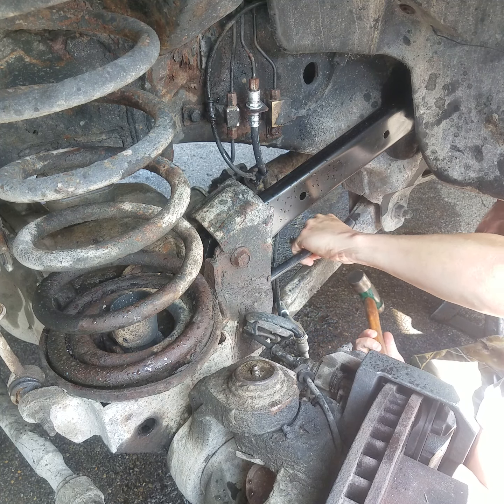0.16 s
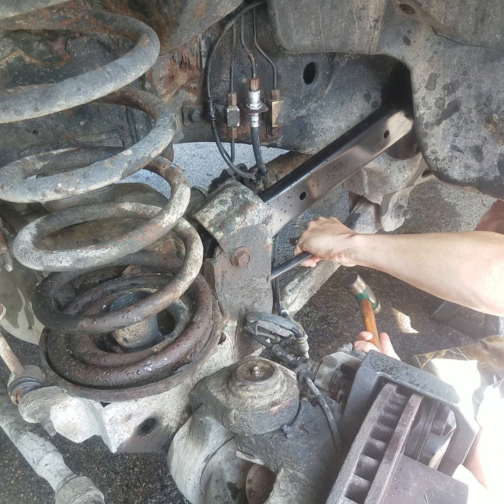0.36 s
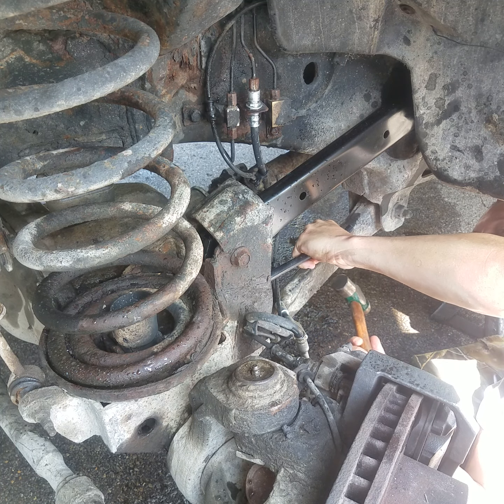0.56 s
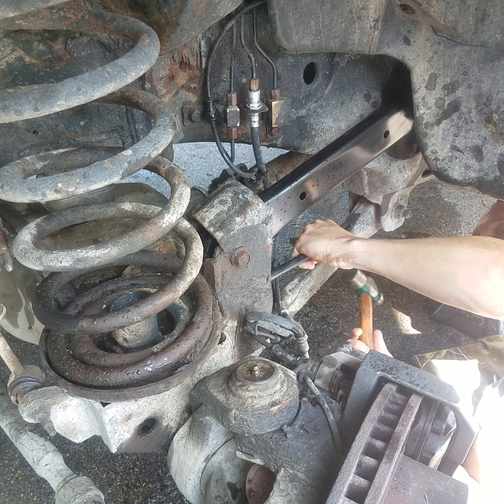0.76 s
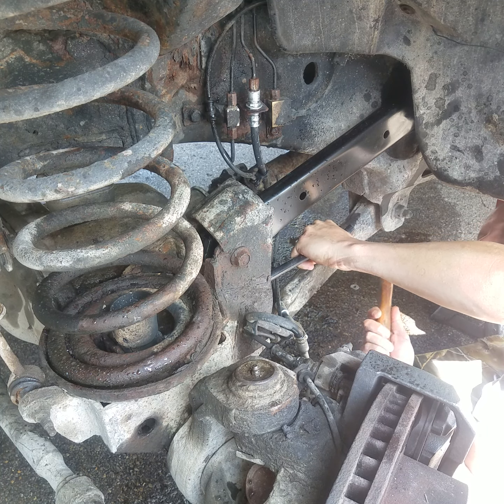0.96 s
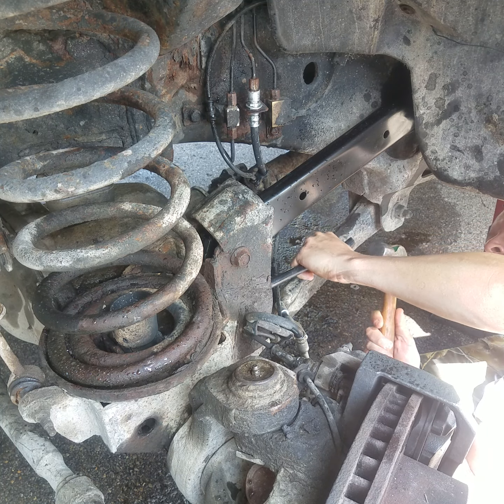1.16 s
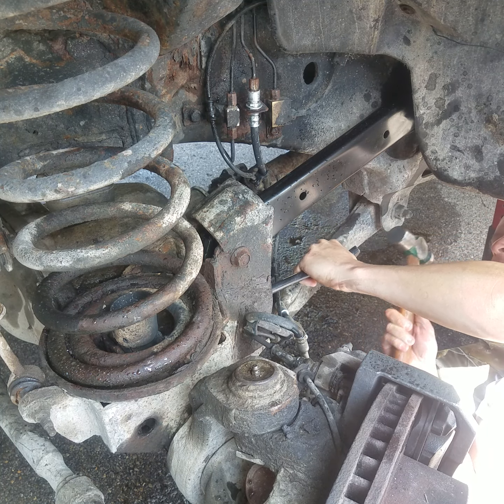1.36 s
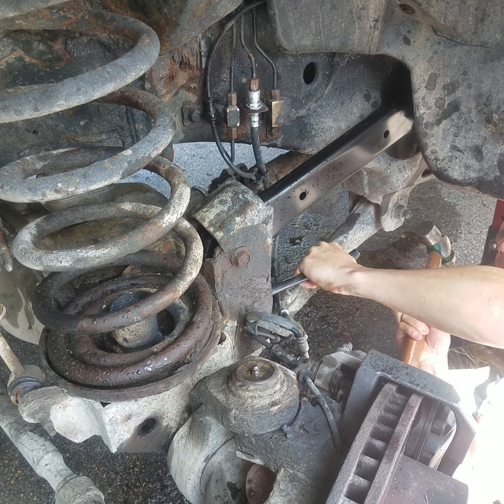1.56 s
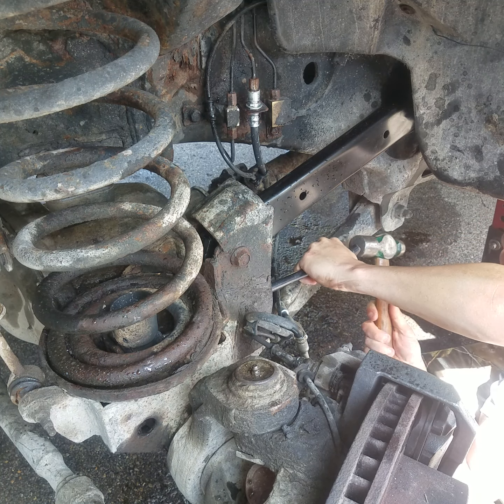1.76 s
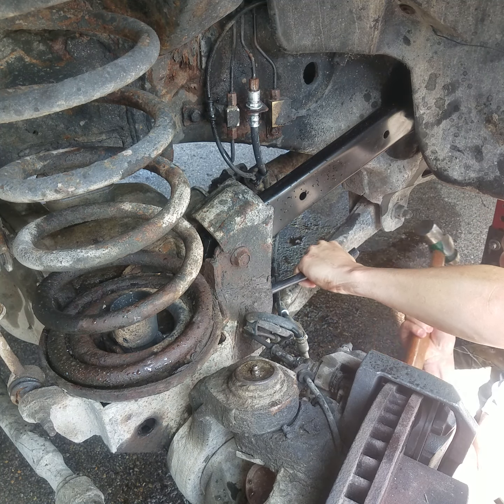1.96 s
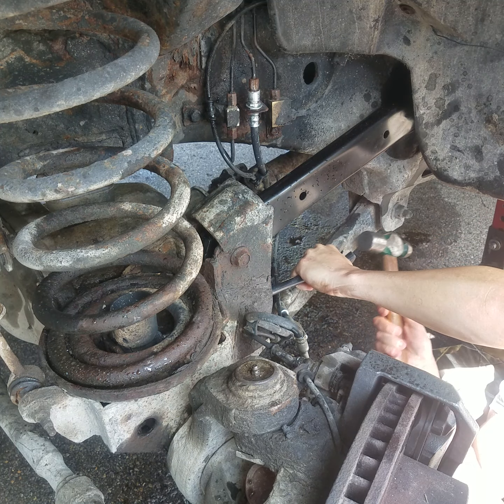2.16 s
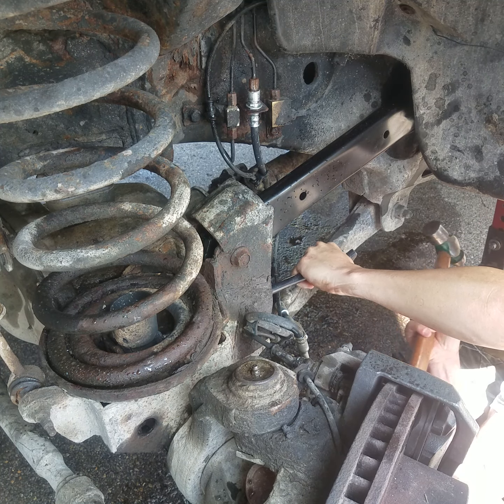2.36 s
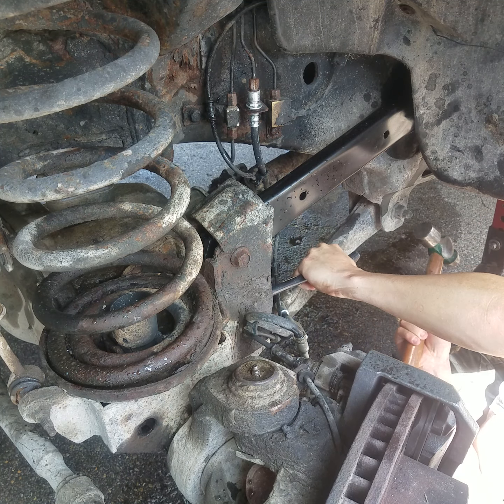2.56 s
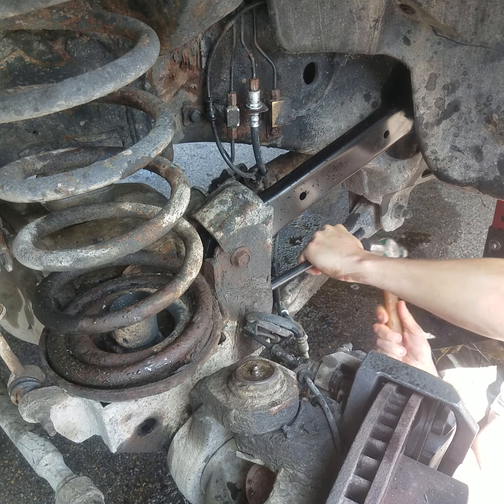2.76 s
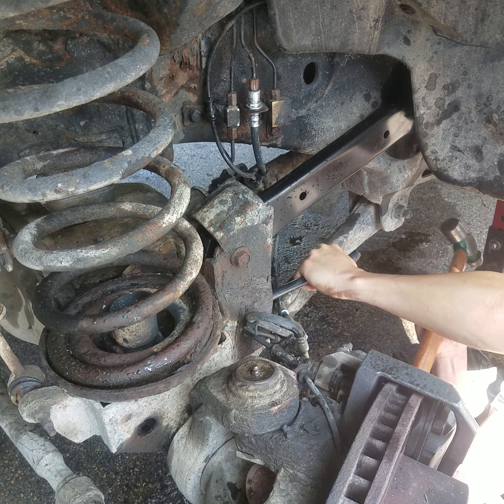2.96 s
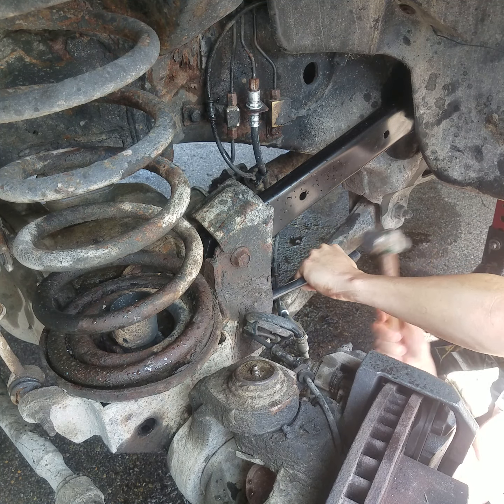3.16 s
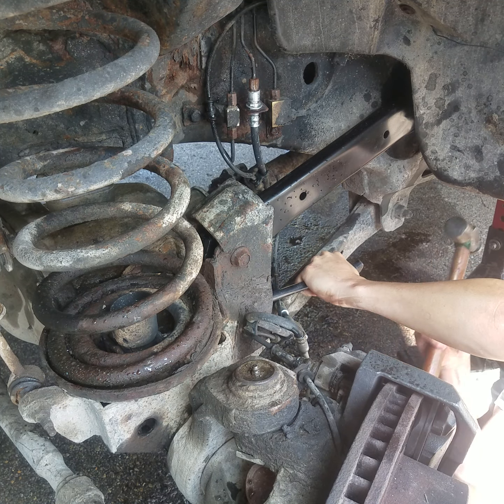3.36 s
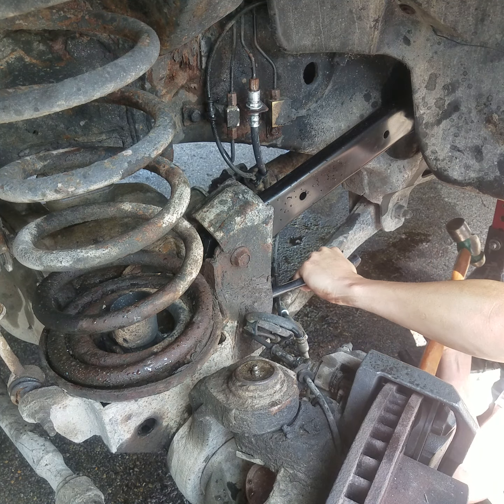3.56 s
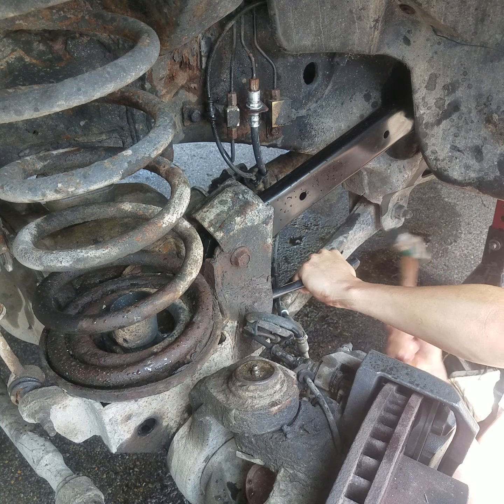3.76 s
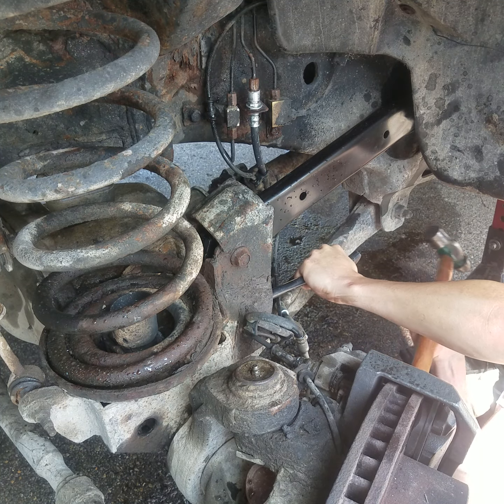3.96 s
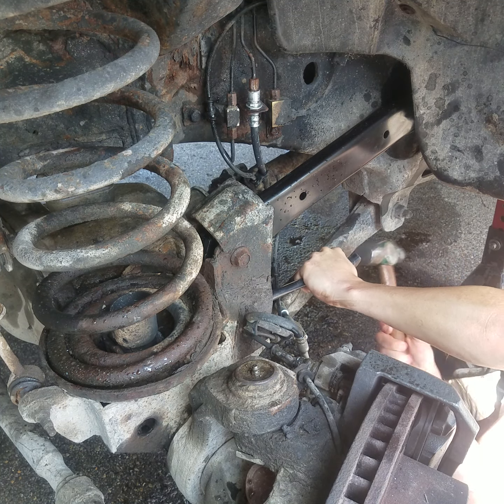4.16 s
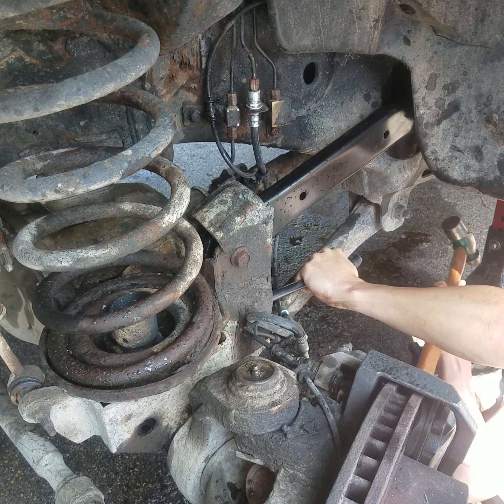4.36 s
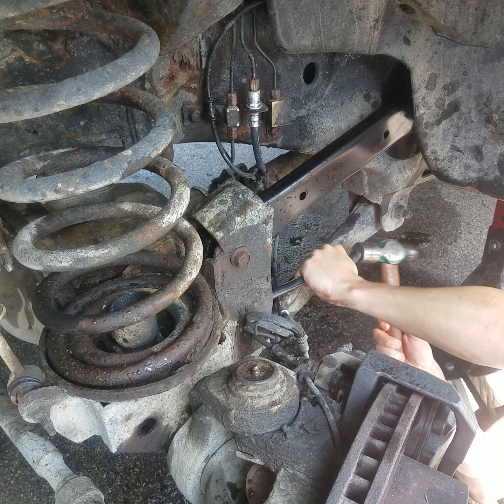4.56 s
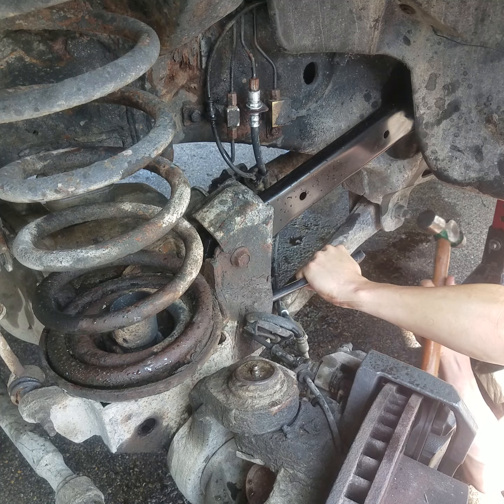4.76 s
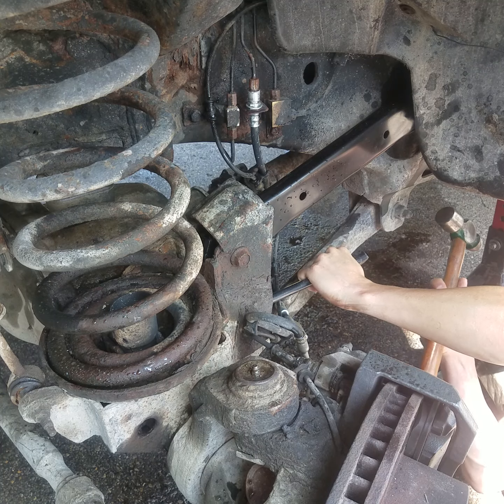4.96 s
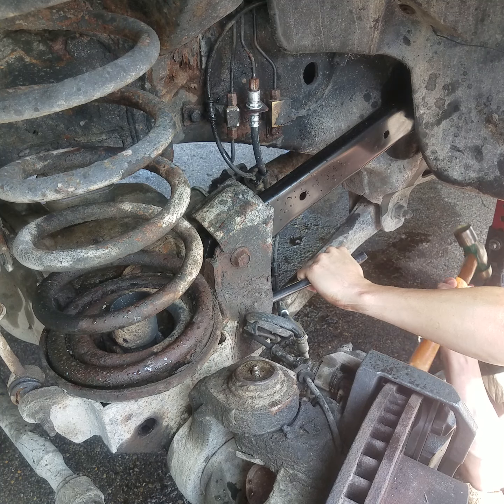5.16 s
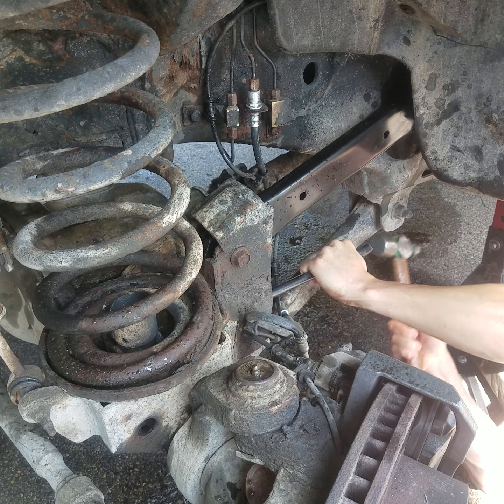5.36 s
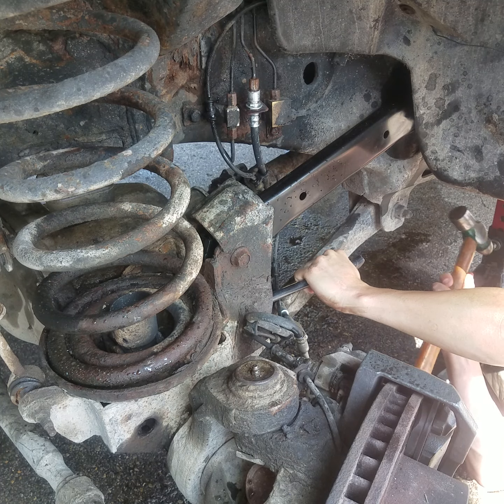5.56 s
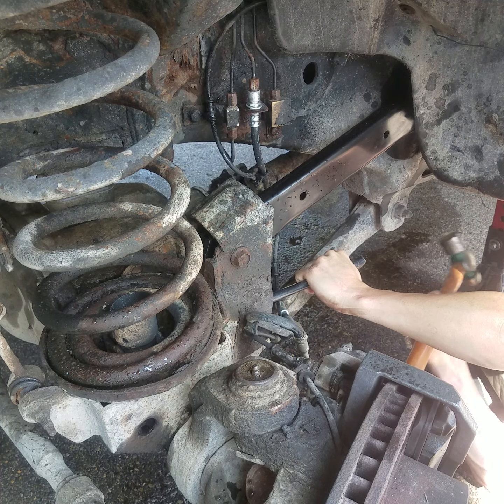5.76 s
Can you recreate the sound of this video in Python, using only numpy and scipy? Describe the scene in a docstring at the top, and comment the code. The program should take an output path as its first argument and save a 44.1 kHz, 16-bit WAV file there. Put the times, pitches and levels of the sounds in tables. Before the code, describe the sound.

A few soft metal clinks and a faint hum give way to close hammering on a steel punch held to a car's suspension bolt. Nine bright, cracking blows land at a slightly uneven pace, each ringing briefly and echoing in the garage while the coil spring sings faintly. Now and then the hammer glances onto the chassis with a duller knock, and tiny ticks and clinks dot the gaps.

```python
"""In a garage, a low rush and hum ease off while tools clink lightly against a bolt of a car's suspension.
From 1.7 s a hammer drives a steel punch against the bolt, about two blows a second, and the rush sinks.
Each blow rings the punch, bolt and suspension arm; the coil spring sings on and the garage echoes.
After some blows the hammer knocks dully on the chassis. Soft clinks and faint ticks fall in between."""
import sys
import numpy as np
from scipy import signal
from scipy.fft import rfft, irfft, next_fast_len
from scipy.io import wavfile

SR = 44100
rng = np.random.default_rng(int(sys.argv[2]) if len(sys.argv) > 2 else 0)


def to_wav(s):
    """Save 16-bit WAV."""
    ch = np.atleast_2d(s).T  # columns
    pcm = np.round(np.clip(ch, -1, 1) * 32767)  # PCM
    wavfile.write(sys.argv[1], SR, pcm.astype(np.int16))


N = 256662
HIT_SAMPLES, ATTACK_SAMPLES = SR // 4, SR // 50  # one whole hit, and its first 20 ms
HIT_TIME = np.arange(HIT_SAMPLES) / SR

# How alike left and right sound, 1 being the same: (frequency [Hz], likeness [0 to 1])
STEREO_LIKENESS = [(50, .82), (160, 0.97), (450, .7), (800, 0.5), (1300, .15), (16000, 0.029)]
# Tone of the early rush, the steady quiet noise and the ticks: (frequency [Hz], level [dB])
RUSH_COLOUR = [(25, -25.5), (60, -11), (110, -7.5), (200, -15), (310, -12.5), (500, -14.5), (1160, -22.5),
               (2000, -29.5), (3000, -31.5), (5100, -44), (7300, -44.5), (8600, -54.5), (14000, -45),
               (16000, -46.5)]
QUIET_COLOUR = [(25, -31), (55, -4), (95, -5), (125, 1), (190, -1.5), (250, -12.5), (420, -11), (800, -13),
                (1200, -20), (2500, -24), (4000, -31), (9000, -39.5), (14000, -28.5)]
TICK_COLOUR = [(500, -24.5), (4000, -6.5), (9000, -2), (15000, -2)]
# Strength of the garage's echo: (frequency [Hz], level [dB])
GARAGE_GAIN = [(50, -11.5), (150, 6), (400, -12.5), (1000, -15.5), (2500, -20.5), (6000, -21), (15000, -16)]
# Time that the echo and the steel take to fade by 60 dB: (frequency [Hz], ring time [s])
GARAGE_RING_TIMES = [(120, 0.64), (400, 0.31), (1000, 0.3), (2500, 0.51), (6000, 0.48), (15000, 0.22)]
STEEL_RING_TIMES = [(150, 0.11), (500, 0.099), (1200, 0.098), (3000, 0.095), (7000, 0.088), (15000, 0.048)]
# Tone of each hit's clatter, a crowd of notes too close to tell apart: (frequency [Hz], level [dB])
CLINK_COLOUR = [(60, -16), (400, 3.5), (1800, 4), (3600, 0), (4500, -9.5), (9500, -22), (14500, -18.5)]
KNOCK_COLOUR = [(40, -20), (200, -25), (340, 2.5), (750, -1.5), (1000, -3.5), (2000, -5), (3600, -4.5),
                (4600, -11.5), (8000, -27), (15700, -11.5)]
BLOW_COLOUR = [(40, -33.5), (150, -9.5), (240, -8), (330, -3), (550, 3), (950, -1), (1400, 3.5),
               (2000, 0.5), (3300, 2.5), (6000, -7.5), (9300, -10), (11000, -8), (13300, -8.5),
               (14000, 0.5), (14700, -8)]
# The notes that each thing rings with: (frequency [Hz], level [dB], ring time [s])
WALL_NOTES = [(307.6, -4, 0.16), (363.5, 5.5, 0.1), (389, -1, 0.12), (460, -1, .2), (523, 1, 0.17),
              (581, -10.5, 0.34)]
SPRING_NOTES = [(172, -12.5, 2.1), (354, -3.5, 0.5), (1186, 1, .33), (1400, -5.5, .5), (1700, -4.5, 0.55),
                (1850, -9.5, .6), (2700, -4.5, 0.3)]
SPRING_LONG_HIGH_NOTE = [(2008, -9, 1.2)]
CHASSIS_NOTES = [(421.3, -12.5, 0.33), (488.6, 2.5, 0.16), (608.6, -4.5, 0.21), (704.4, 2, 0.085),
                 (743.4, -1, 0.098), (851, -11, .2), (1190, -4.5, 0.15), (1300, -3, 0.055),
                 (1384, -10, 0.27), (1595, -5.5, 0.082), (1826, -10, 0.13), (1950, -12, 0.14),
                 (2120, -7, .14), (2595, -12, 0.14), (3090, -7, 0.081), (3630, -6.5, 0.065)]
ARM_NOTES = [(1177, -0.5, 0.036), (1267, -8, 0.017), (1450, -8.5, 0.061), (1568, -5, 0.08),
             (1794, -0.5, 0.087), (1797, -2, 0.081), (2623, -1.5, .06), (3200, -11, 0.03),
             (3670, -8.5, 0.017)]
BOLT_NOTES = [(3585, -0.5, .075), (5310, -11, .085), (6460, -9, 0.095), (7060, -17, 0.12),
              (8700, -19, 0.045), (11100, -19.5, .08), (12100, -15, .07), (14340, -18.5, .06)]
PUNCH_NOTES = [(2262, -3, 0.088), (2220, -8.5, 0.076), (5115, -6, 0.076), (5180, -9, 0.073),
               (14000, -9.5, .04)]
# Tools shifting against the bolt: (time [s], level [dB], brightness [dB per octave])
CLINKS = [(.012, -28, 0), (.031, -32, -.5), (.048, -38, -7.5), (.1743, -37.5, -0.5), (.216, -42.5, -5.5),
          (.263, -49, -6.5), (.3217, -39, -5.5), (.343, -49.5, -4), (.363, -47.5, -6), (1.37, -54, 0),
          (1.995, -52.5, -7.5), (2.043, -48, -4.5), (2.941, -46, -6), (3.038, -54.5, -10.5),
          (4.012, -54, -8), (4.447, -52.5, -9), (5.651, -52, 3)]
# Hammer glancing onto the chassis: (time [s], level [dB], brightness [dB per octave], cutoff [Hz])
KNOCKS = [(2.1789, -16, 1, 645), (4.6466, -13, 1, 2000), (5.378, -14, 2, 873), (5.3963, -11, 2.5, 2070)]
# Hammer on punch; a square hit is brighter, and a loose grip lets the punch ring:
# (time [s], level [dB], brightness [dB per octave], extra punch level [dB], ring time stretch [factor])
BLOWS = [(1.715, -9, 2, -13.5, 1.43), (2.088, -13.5, -0.5, 7, 1.32), (2.668, -11, 1, 7, 1.41),
         (3.1462, -12.5, 1.1, 2.5, 1.39), (3.7679, -14, -.9, 1.5, 1.46), (4.1415, -13, -0.42, -3, 1.3),
         (4.528, -12, 0.2, -13, 1.28), (5.286, -13, 0.23, -2, 2.23), (5.8146, -8.5, 0.65, 2, 2.1)]
FIRST_BLOW_S = BLOWS[0][0]


def amp(db):
    """Turns decibels into a number to multiply by."""
    return 10 ** (np.asarray(db) / 20)


def look_up(table, hz):
    """Reads between a table's rows, with frequencies spaced by octaves."""
    table_hz, value = np.transpose(table)
    return np.interp(np.log(hz + 1), np.log(table_hz + 1), value)


def add(mix, time_s, sound):
    """Mixes a stereo sound in at the given time."""
    part = mix[:, max(round(time_s * SR), 0):][:, :sound.shape[1]]
    part += sound[:, :part.shape[1]]


def drift(per_s):
    """A wandering curve through per_s random points a second."""
    points = rng.standard_normal(256)
    return np.interp(np.arange(N) * per_s / SR, np.arange(len(points)), points)


def noise(colour, size):
    """Stereo noise of the given tone and a power of one; left and right are alike in the bass."""
    hz = np.fft.rfftfreq(size, 1 / SR)
    left, other = rfft(rng.standard_normal((2, size)))
    likeness = look_up(STEREO_LIKENESS, hz)
    right = likeness * left + np.sqrt(1 - likeness ** 2) * other
    sound = irfft(np.array([left, right]) * amp(look_up(colour, hz)), size)
    return sound / np.sqrt(np.mean(sound ** 2) + 1e-20)


def fade_in(rise_s, size=HIT_SAMPLES):
    """A vibration takes a moment to build up."""
    return 1 - np.exp(-np.arange(size) / (SR * rise_s))


def die_away(sound, ring_times, stretch=1):
    """Lets every frequency fade at its own speed; a larger stretch rings longer."""
    hz, t, spectrum = signal.stft(sound, SR, nperseg=256)
    fade = np.exp(-np.log(1000) * t / (stretch * look_up(ring_times, hz)[:, None]))
    return signal.istft(spectrum * fade, SR, nperseg=256)[1][:, :sound.shape[1]]


def ring(notes, spread_db, stretch=1, size=HIT_SAMPLES):
    """Fading notes, a little different at each strike; high ones are out of step left and right."""
    hz, db, ring_s = np.transpose(notes)
    strength, side, phase, lag = rng.standard_normal((len(hz), 4)).T
    phase_gap = lag * np.sqrt(-2 * np.log(look_up(STEREO_LIKENESS, hz)))
    gain = amp(db + spread_db * (strength + np.array([side, -side]) / 2))
    start = gain * np.exp(1j * (np.pi * phase + np.array([phase_gap, -phase_gap]) / 2))
    # each sample moves a note's wave on and shrinks it a little
    step = np.exp((2j * np.pi * hz - np.log(1000) / (ring_s * stretch)) / SR)
    return (start @ np.cumprod(np.repeat(step[:, None], size, 1), 1)).real


def bunch_notes(sound, patchy_db, spacing_hz, from_hz=700):
    """The higher notes bunch into peaks and gaps that depend on where the hit lands."""
    hz = np.fft.rfftfreq(HIT_SAMPLES, 1 / SR)
    bumps = np.interp(hz / spacing_hz, np.arange(256), rng.standard_normal(256))
    depth_db = patchy_db * (1 - np.exp(-(hz / from_hz) ** 2))
    return irfft(rfft(sound) * amp(depth_db * bumps), HIT_SAMPLES)


def soften(sound, cutoff_hz, damping=0.32, tick_db=-22):
    """A slow, soft hit barely shakes notes far above the cutoff; only a faint tick gets past."""
    ratio = np.fft.rfftfreq(HIT_SAMPLES, 1 / SR) / cutoff_hz
    low_pass = 1 / (1 - ratio ** 2 + 1j * damping * ratio)
    return irfft(rfft(sound) * (low_pass - amp(tick_db)), HIT_SAMPLES)


def shape_hit(sound, level_db, brightness, pivot_hz=1510):
    """Tips a hit towards treble or bass, then sets the level of its attack."""
    hz = np.fft.rfftfreq(2 * ATTACK_SAMPLES, 1 / SR)
    octaves = np.log2(np.maximum(hz / pivot_hz, 1 / 4))
    log_gain = np.log(amp(brightness * octaves))
    # a filter built this way makes no sound ahead of the hit
    response = np.exp(signal.hilbert(np.r_[log_gain, log_gain[-2:0:-1]]).conj())
    taps = np.fft.ifft(response).real[None, :ATTACK_SAMPLES]
    tipped = signal.fftconvolve(sound, taps, axes=1)[:, :HIT_SAMPLES]
    return amp(level_db) * tipped / np.sqrt(np.mean(tipped[:, :ATTACK_SAMPLES] ** 2))


def background(rush_db=-52.5, hum_db=-57.5, hum_hz=124.2, quiet_db=-58):
    """A low rush and a wavering hum sink away, leaving a quiet noise."""
    t, size = np.arange(N) / SR, next_fast_len(N, True)
    cycles = np.cumsum(hum_hz + 1.1 * drift(per_s=4.4)) / SR
    hum = np.sqrt(2) * np.sin(2 * np.pi * cycles) * amp(hum_db + 3 * drift(per_s=12))
    rush = amp(rush_db) * noise(RUSH_COLOUR, size)[:, :N]
    quiet = amp(quiet_db + drift(per_s=14)) * noise(QUIET_COLOUR, size)[:, :N]
    early_lift_db = 5 * np.exp(-t / 0.45)
    hammering_s = np.maximum(t - FIRST_BLOW_S, 0)
    sink_db = 27.5 * (1 - np.exp(-hammering_s / 0.36))
    return (rush + hum) * amp(early_lift_db - sink_db) + quiet


def ticks(per_s=8.1, level_db=-54, spread_db=6.5, fade_s=0.0012):
    """Once the hammering has begun, faint dry ticks fall at random."""
    out = np.zeros((2, N))
    tick = noise(TICK_COLOUR, ATTACK_SAMPLES) * np.exp(-HIT_TIME[:ATTACK_SAMPLES] / fade_s)
    chance, strength = rng.random(N), rng.standard_normal(N)
    hammering = np.arange(N) > FIRST_BLOW_S * SR
    for at in np.flatnonzero((chance < per_s / SR) & hammering):
        add(out, at / SR, amp(level_db + spread_db * strength[at]) * tick)
    return out


def garage_echo(sound):
    """The room smears each sound into a tail, longest and strongest in the bass."""
    hz = np.fft.rfftfreq(SR, 1 / SR)
    even_energy = np.sqrt(2 * np.log(1000) / (SR * look_up(GARAGE_RING_TIMES, hz)))
    white = noise([(1, 0), (SR, 0)], SR)
    reflections = irfft(rfft(white) * even_energy * amp(look_up(GARAGE_GAIN, hz)), SR)
    tail = die_away(reflections, GARAGE_RING_TIMES) * fade_in(rise_s=0.015, size=SR)
    return signal.fftconvolve(sound, tail, axes=1)[:, :N]


def coil_spring(blow_db=-47.5, knock_db=-31, sharp_hz=1500):
    """Blows and knocks shake the spring, most when the chassis is hit directly and sharply."""
    out = np.zeros((2, N))
    notes = np.vstack([SPRING_NOTES, SPRING_LONG_HIGH_NOTE])
    song = ring(notes, spread_db=0.5, size=SR) * fade_in(rise_s=0.005, size=SR)
    centred = song[[0, 0]]  # the spring is straight ahead: the same on both sides
    for time_s, level_db, *_ in BLOWS:
        add(out, time_s, amp(level_db + blow_db) * centred)
    for time_s, level_db, _, cutoff_hz in KNOCKS:
        sharpness = min(cutoff_hz / sharp_hz, 1) ** 2
        add(out, time_s, amp(level_db + knock_db) * sharpness * centred)
    return out


def tool_clinks(bolt_db=-5):
    """Tools, muffled by the hand, touch the bolt and the metal around it."""
    out = np.zeros((2, N))
    for time_s, level_db, brightness in CLINKS:
        clatter = bunch_notes(noise(CLINK_COLOUR, HIT_SAMPLES), patchy_db=5, spacing_hz=161)
        clatter = die_away(clatter, STEEL_RING_TIMES)
        bolt = amp(bolt_db) * ring(BOLT_NOTES, spread_db=1.2)
        clink = (clatter + bolt) * fade_in(rise_s=0.001)
        add(out, time_s, shape_hit(clink, level_db, brightness))
    return out


def chassis_knocks(chassis_db=-5, bounce_s=0.009, bounce_db=-9):
    """A softer, longer hit rings the chassis itself; the hammer head bounces once."""
    def touch():
        """One touch of the hammer head on the chassis."""
        clatter = die_away(noise(KNOCK_COLOUR, HIT_SAMPLES), STEEL_RING_TIMES, stretch=1.35)
        chassis = amp(chassis_db) * ring(CHASSIS_NOTES, spread_db=1.4, stretch=0.75)
        return (clatter + chassis) * fade_in(rise_s=0.00084)

    out = np.zeros((2, N))
    for time_s, level_db, brightness, cutoff_hz in KNOCKS:
        knock = touch()
        add(knock, bounce_s, amp(bounce_db) * touch())
        add(out, time_s, shape_hit(soften(knock, cutoff_hz), level_db, brightness))
    return out


def hammer_blows(punch_db=-3, arm_db=-4.5, bolt_db=-11, wall_db=-26.5, wall_delay_s=0.021):
    """Steel on steel: a crack, the ring of punch, arm and bolt, then a boom from the walls."""
    out = np.zeros((2, N))
    shared, alike = noise(BLOW_COLOUR, HIT_SAMPLES), 0.46  # all blows share this part of their clatter
    crack = 1 + np.exp(-(HIT_TIME / 0.0069) ** 2)  # lifts the first 7 ms or so
    for time_s, level_db, brightness, loose_db, stretch in BLOWS:
        clatter = np.sqrt(alike) * shared + np.sqrt(1 - alike) * noise(BLOW_COLOUR, HIT_SAMPLES)
        clatter = bunch_notes(clatter, patchy_db=2.1, spacing_hz=220)
        clatter = die_away(clatter, STEEL_RING_TIMES, stretch) * crack
        punch = amp(punch_db + loose_db) * ring(PUNCH_NOTES, spread_db=1.5, stretch=stretch)
        arm = amp(arm_db) * ring(ARM_NOTES, spread_db=2.2, stretch=stretch)
        bolt = amp(bolt_db) * ring(BOLT_NOTES, spread_db=2.2, stretch=stretch)
        blow = (clatter + punch + arm + bolt) * fade_in(rise_s=0.0017)
        add(out, time_s, shape_hit(blow, level_db, brightness))
        boom = ring(WALL_NOTES, spread_db=1.5) * fade_in(rise_s=0.004)
        add(out, time_s + wall_delay_s, amp(wall_db) * boom)
    return out


def scene(left_db=0.5):
    """All the hits, slightly to the left, with their echo, the spring, the background and the ticks."""
    steel = (hammer_blows() + chassis_knocks() + tool_clinks()) * amp([[left_db], [-left_db]])
    return steel + garage_echo(steel) + coil_spring() + background() + ticks()


def record(dry, ceiling=0.83, cutoff_hz=16000):
    """Rounds off the loudest peaks, then removes the highest treble."""
    rounded = ceiling * np.tanh(dry / ceiling)
    low_pass = signal.firwin(301, cutoff_hz, window=("kaiser", 10), fs=SR)
    return signal.oaconvolve(rounded, low_pass[None], "same", axes=1)


dry = scene()
out = record(dry)
to_wav(out)
```